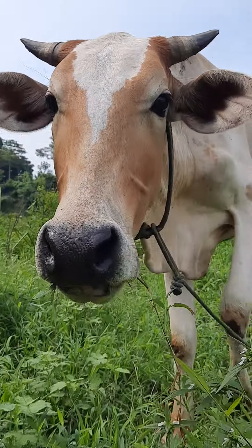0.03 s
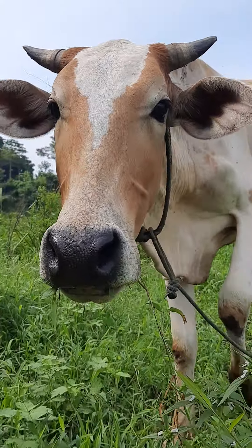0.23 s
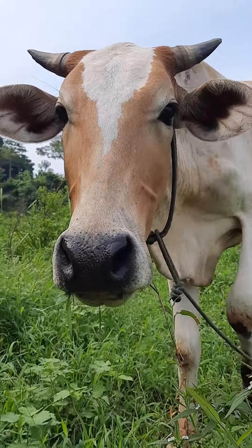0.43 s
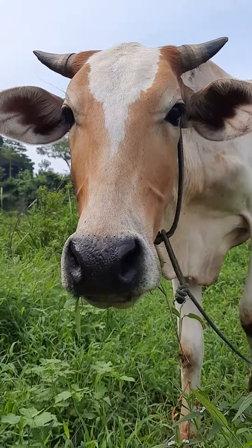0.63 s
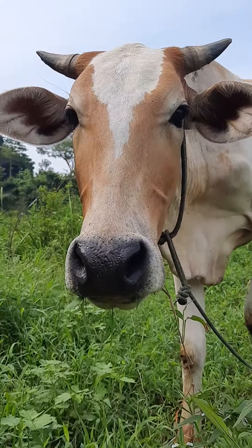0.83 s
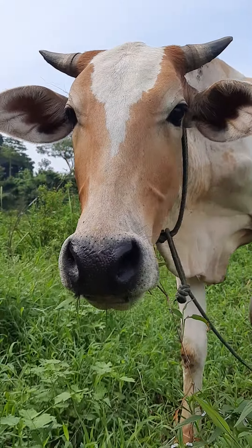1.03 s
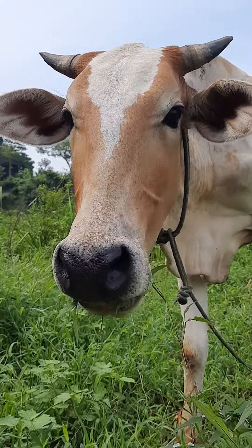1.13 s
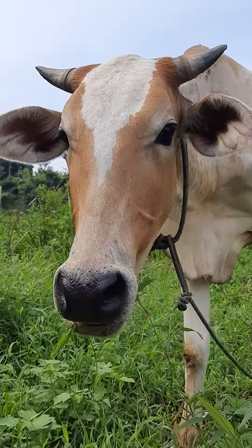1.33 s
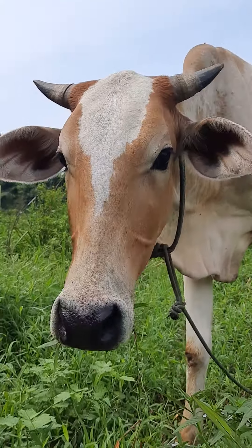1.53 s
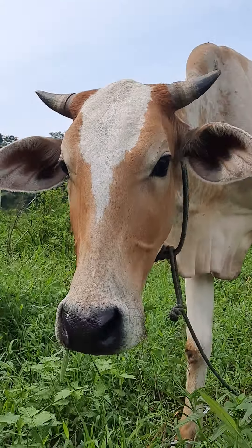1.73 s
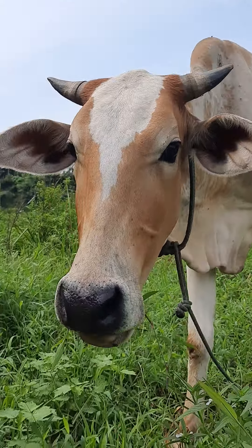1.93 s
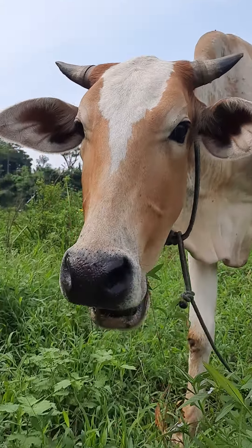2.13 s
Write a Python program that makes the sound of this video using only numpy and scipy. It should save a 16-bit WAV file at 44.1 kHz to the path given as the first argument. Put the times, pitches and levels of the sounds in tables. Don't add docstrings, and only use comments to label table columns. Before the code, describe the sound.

A cow tears and chews grass very close, amid heavy microphone knocks and shrill insects.

```python
import sys
import numpy as np
from scipy import signal
from scipy.fft import rfft, irfft, next_fast_len
from scipy.io import wavfile
from scipy.ndimage import uniform_filter1d, minimum_filter1d, map_coordinates

SR = 44100
rng = np.random.default_rng(int(sys.argv[2]) if len(sys.argv) > 2 else 0)


def to_wav(sig):
    pcm = np.clip(np.atleast_2d(sig), -1, 1) * 32767
    pcm = np.round(pcm).astype(np.int16)
    wavfile.write(sys.argv[1], SR, pcm.T)


def gain_from_decibels(decibels):
    exponent = np.asarray(decibels, float) / 20
    return 10 ** exponent


N = 95652
TIME = np.arange(N) / SR


def unit(x):
    return x / np.sqrt(np.mean(x ** 2) + 1e-20)


def curves(rows):
    s, *columns = np.transpose(rows)
    return [np.interp(TIME, s, column) for column in columns]


def wobble(rate):
    return map_coordinates(rng.standard_normal(N), [np.arange(N) * rate / SR])


def filtered(x, response):
    m = next_fast_len(N + SR // 2)
    spectrum = rfft(x, m) * response(np.fft.rfftfreq(m, 1 / SR))
    return irfft(spectrum, m)[:N]


def noise(points):
    f, db = np.transpose(points)

    def gain(hz):
        return gain_from_decibels(np.interp(np.log(hz + 1), np.log(f), db, left=-120))
    return unit(filtered(rng.standard_normal(N), gain))


def tube(peaks):
    def gain(f):
        total = 0
        for centre, width, db in peaks:
            resonator = 1j * f * width / (centre * centre - f * f + 1j * f * width)
            total = total + gain_from_decibels(db) * resonator ** 2
        return total
    return unit(filtered(rng.standard_normal(N), gain))


def bell(hz, wide_hz):
    return lambda f: np.exp(-.5 * ((f - hz) / wide_hz) ** 2)


def band_noise(hz, wide_hz):
    return unit(filtered(rng.standard_normal(N), bell(hz, wide_hz)))


def tone(hz, db):
    phase = 2 * np.pi * np.cumsum(hz) / SR
    return np.sqrt(2) * gain_from_decibels(db) * np.sin(phase)


def puffs(rows, hz, wide_hz):
    swell = sum(gain_from_decibels(db) * np.exp(-((TIME - s) / spread) ** 2) for s, db, spread in rows)
    return swell * band_noise(hz, wide_hz)


# f/Hz, level/dB
FIELD_TONE = [(20, -17), (80, -25), (200, -16.5), (450, -11.5), (900, -13.5), (3300, -17.5), (7000, -8),
              (12500, -10), (13500, -24), (15800, -14)]


def field():
    return gain_from_decibels(-61.5 + 1.2 * wobble(26)) * noise(FIELD_TONE)


# t/s, level/dB
CHORUS_LEVEL = [(0, -53.5), (.77, -52), (1.09, -57.5), (1.24, -55.5), (1.62, -58), (1.94, -52.5),
                (2.17, -59)]


def chorus():
    clicks_per_s = 1200
    db, = curves(CHORUS_LEVEL)
    clicks = (rng.random(N) < clicks_per_s / SR) * rng.standard_normal(N)
    clicks = clicks + 0.28 * rng.standard_normal(N)
    clicks *= gain_from_decibels(0.9 * wobble(40.36) + 1.22 * wobble(120))
    near = unit(filtered(clicks, bell(8630, 442)))
    far = band_noise(4784, 300)
    far_db = -64 + 0.13 * (db + 52) - 2 * TIME + wobble(9.9)
    return gain_from_decibels(db + 7.5) * near + gain_from_decibels(far_db) * far


def span(rows):
    fade_in = np.clip((TIME - rows[0][0]) / 0.01, 0, 1)
    fade_out = np.clip((rows[-1][0] - TIME) / 0.01, 0, 1)
    return fade_in * fade_out


# t/s, f/Hz, level/dB
WHISTLE_PATH = [(.675, 5320, -71), (.81, 5270, -63), (.85, 5060, -67), (.9, 4950, -71), (.94, 4990, -70),
                (.972, 4930, -69), (1.012, 5010, -69), (1.05, 4895, -68), (1.09, 4920, -67),
                (1.13, 5020, -66), (1.175, 4890, -66), (1.25, 4915, -66), (1.3, 5085, -68),
                (1.355, 4945, -67), (1.412, 4900, -65), (1.435, 4960, -73), (1.53, 5030, -71),
                (1.58, 4905, -72), (1.62, 4890, -84)]


def whistle():
    plunge_hz, plunge_s = 1710, 0.028
    buzz_hz, buzz_depth, buzz_from_s = 420, 1.05, .84
    hz, db = curves(WHISTLE_PATH)
    hz = hz + plunge_hz * np.exp(-np.abs(TIME - WHISTLE_PATH[0][0]) / plunge_s)
    buzz_onset = np.clip((TIME - buzz_from_s) / .05, 0, 1)
    buzz = buzz_depth * buzz_onset * tone(buzz_hz + 12 * wobble(15), -1.5 + 1.5 * wobble(30))
    voice = tone(hz + 3 * wobble(22) + 34 * wobble(260), db + 6 + 2.2 * wobble(110))
    throat, dip = bell(4905, 45), bell(4700, 70)
    return filtered(span(WHISTLE_PATH) * (1 + buzz) * voice, lambda f: 1 + 1.6 * throat(f) - 0.84 * dip(f))


# t/s, f/Hz, level/dB
RISE_PATH = [(.58, 6400, -78), (.61, 6350, -67), (.635, 6200, -72), (.67, 6600, -69), (.69, 7050, -65),
             (.72, 7350, -68), (.76, 7700, -76)]


def rising_whistle():
    hz, db = curves(RISE_PATH)
    return span(RISE_PATH) * tone(hz + 30 * wobble(120), db + 3 + 2 * wobble(60))


# t/s, length/s, start f/Hz, level/dB
CHIRP_CALLS = [
    (1.707, .03, 5500, -63),
    (1.796, .024, 5150, -63),
    (1.826, .056, 5550, -62),
    (1.94, .022, 4950, -66),
]


def chirps():
    end_hz, blur_hz, flutter_db = 4750, 90, 4
    out = np.zeros(N)
    for s, length, hz, db in CHIRP_CALLS:
        u = np.clip((TIME - s) / length, 0, 1)
        flutter = gain_from_decibels(flutter_db * np.sin(TIME * 700 + 9 * u))
        pitch = hz + (end_hz - hz) * u + blur_hz * wobble(180)
        out += np.sin(np.pi * u) * flutter * tone(pitch, db)
    return out


# t/s, level/dB
RUMBLE_LEVEL = [(0, -47.5), (.3, -40), (.55, -45.5), (.9, -46.5), (1.39, -44.5), (1.51, -47), (1.76, -49),
                (1.85, -36), (2.0, -51), (2.17, -49.5)]
# f/Hz, level/dB
RUMBLE_COLOUR = [(20, -38), (45, 3.5), (90, 0), (140, -5.5), (250, -18.5), (500, -32.5), (900, -63),
                 (2000, -100)]


def rumble():
    db, = curves(RUMBLE_LEVEL)
    return gain_from_decibels(db + 6.5 + 2.13 * wobble(30.04)) * noise(RUMBLE_COLOUR)


# t/s, level/dB, spread/s
HAND_SCUFFS = [
    (.075, -53.5, .04),
    (.26, -53.5, .035),
    (.79, -56, .025),
    (1.07, -63, 0.023),
    (1.21, -56, .02),
    (1.415, -60, .012),
    (1.86, -62, 0.038),
]


def scuffs():
    return puffs(HAND_SCUFFS, 480, 220) * gain_from_decibels(3 * wobble(120))


# t/s, level/dB, start f/Hz, life/s, pitch sag/(1/s)
HOUSING_SWINGS = [(0.039, -7.5, 81, .011, 7.7), (0.073, -27.5, 68, 0.027, 4.4),
                  (.208, -7.5, 84.6, 0.011, 4.6), (0.243, -22, 99, 0.023, 2),
                  (0.2898, -30.5, 103.4, 0.042, 3.2), (0.388, -29.5, 81, 0.028, 5.4),
                  (0.72, -27.5, 88.5, 0.016, 3.1), (0.7732, -4.5, 105, 0.029, 36),
                  (0.8082, -11, 97.6, 0.014, 35), (1.0511, -19, 84, 0.019, 3.3),
                  (1.0873, -24.5, 110, 0.014, 2.6), (1.194, -26, 102.6, 0.017, 2),
                  (1.4044, -11, 87, 0.012, 6.6), (1.492, -27.5, 85, 0.011, 2),
                  (1.729, -26, 77.6, 0.011, 2.7), (1.84, -42.5, 101, 0.014, 3.2),
                  (1.9628, 12.5, 121, 0.0044, 180), (1.9733, -7.5, 113.4, 0.024, 1),
                  (2.122, -30, 75.7, 0.023, 3), (0.509, -31.5, 120.2, 0.055, 2.07),
                  (0.826, -19.5, 73.4, 0.015, 3), (2.016, -28, 92.5, 0.029, 1.5)]


def swings():
    rise_s, fade_power = 0.0016, 2.36
    out = np.zeros(N)
    for s, db, hz, life, sag in HOUSING_SWINGS:
        u = np.clip(TIME - s, 0, None)
        turns = hz * (1 - np.exp(-sag * u)) / sag
        envelope = np.exp(-(u / life) ** fade_power) * (1 - np.exp(-(u / rise_s) ** 2))
        out += gain_from_decibels(db) * np.sin(2 * np.pi * turns) * envelope
    return out


# t/s, level/dB, f/Hz
KNOCK_EDGES = [
    (0.0399, -50, 1200),
    (0.208, -56, 885),
    (0.772, -46.5, 1290),
    (1.193, -54, 1110),
    (1.404, -51.5, 1500),
    (1.814, -63, 1200),
    (1.8655, -64, 1300),
    (1.9627, -37, 1760),
]


def snaps():
    width_ms = 1
    grit = noise([(700, 8), (1700, -12.5), (3000, -14.5), (16000, -39.5)])
    out = np.zeros(N)
    for s, db, hz in KNOCK_EDGES:
        envelope = np.exp(-.5 * ((TIME - s) * 1000 / width_ms) ** 2)
        out += gain_from_decibels(db) * envelope * (np.cos(2 * np.pi * hz * (TIME - s)) + 0.65 * grit)
    return out


# t/s, peak level/dB,
# width/ms, direction (sign), lobe before it (0-1)
HOUSING_KNOCKS = [(0.0405, -2, 0.75, -1, 0.27), (0.063, -14.5, 0.64, 1, 0), (0.2086, -7, 0.73, -1, .3),
                  (0.237, -15.5, 0.98, 1, 0.6), (0.261, -21.5, 0.74, -1, 0.1), (0.7723, -8, 0.57, -1, 0),
                  (0.7737, -13.5, 0.62, 1, 0.17), (0.804, -15.5, 1.6, 1, 0.1), (0.807, -26, 0.68, -1, 0),
                  (1.05, -16, 0.76, -1, 0.47), (1.0467, -17, 0.93, 1, 0), (1.17, -24, 0.81, -1, 0.4),
                  (1.19, -30, 0.48, 1, 0.5), (1.1931, -15.5, 0.6, -1, 0), (1.205, -26, 0.53, 1, 0.3),
                  (1.212, -28, 0.5, -1, 0.7), (1.405, -6, 0.53, -1, 0.38), (1.808, -21, 0.77, 1, 0.27),
                  (1.8145, -26.5, 0.76, -1, 0.24), (1.841, -35, 0.52, -1, .3), (1.851, -36.5, .5, 1, .3),
                  (1.8653, -38, 0.49, 1, 0.2), (1.879, -40.5, 0.4, -1, .3), (1.895, -24.5, 0.86, 1, 0.35),
                  (1.957, -25, 0.88, -1, 0), (1.96, -13.5, 0.57, -1, 0.26), (1.9629, 6, 0.58, 1, 0.12),
                  (1.9641, 16, 0.69, -1, 0.06), (2.1686, -36, 0.075, 1, 0), (1.9705, -5.5, .8, -1, 0.3),
                  (1.9731, 7, 0.87, -1, 0), (2.034, -31, 0.73, 1, 0.5)]


def knocks():
    lead = 1.72

    def bump(u):
        return 1 / np.cosh(np.clip(0.77 * u, -40, 40)) ** 2
    out = np.zeros(N)
    for s, db, ms, way, lobe in HOUSING_KNOCKS:
        u = (TIME - s) * 1000 / ms
        push = bump(u) - lobe * bump(0.76 * (u + lead))
        out += gain_from_decibels(db) * np.sign(way) * push
    return out


# t/s, level/dB, upper resonances level/dB
NOSE_BREATH = [(0, -78, 7), (.06, -59.5, 1.5), (.17, -70.5, -3), (.3, -55.5, -9), (.4, -64.5, -4.5),
               (.58, -72, 3), (.65, -79.5, 2), (.88, -78.5, -19), (.95, -63.5, -18), (1.12, -52.5, -16),
               (1.22, -53.5, -14), (1.3, -64, -5), (1.43, -64, -4.5), (1.48, -72.5, 6.5),
               (1.62, -54.5, -0.5), (1.69, -60, -3), (1.72, -80, 2), (2.17, -88, -21)]
# f/Hz, width/Hz, level/dB
NOSE_LOWER = [(290, 62, -2.5), (469, 203, 5)]
# f/Hz, width/Hz, level/dB
NOSE_UPPER = [(979, 120, 1), (1089, 136, 3.5), (1293, 420, 3)]


def nose():
    db, upper_db = curves(NOSE_BREATH)
    upper = gain_from_decibels(upper_db + 0.97 * wobble(60)) * tube(NOSE_UPPER)
    return gain_from_decibels(db + 0.74 * wobble(35.34)) * (tube(NOSE_LOWER) + upper)


# t/s, level/dB, spread/s
STALK_CRACKS = [
    (1.215, -66, .012),
    (1.425, -67, .012),
    (1.752, -60, .005),
]


def stalks():
    return puffs(STALK_CRACKS, 11800, 1500)


# t/s, level/dB, spread/s
MUNCH_STROKES = [
    (.06, -61, 0.089),
    (.42, -59.5, 0.17),
    (1.121, -64, 0.13),
    (1.61, -65, 0.056),
    (2.12, -68.5, 0.069),
]


def munch():
    return puffs(MUNCH_STROKES, 2030, 1100)


# t/s, level/dB, rise/s, fall/s
GRASS_TEARS = [
    (0.059, -57, 0.071, 0.071),
    (0.289, -65, 0.12, 0.078),
    (0.541, -61, 0.032, 0.033),
    (2.099, -72, 0.043, 0.11),
]
# f/Hz, level/dB
GRASS_TONE = [(1500, -2), (3000, -2.5), (6000, -2), (10000, 5), (13000, 1), (15800, 0)]
# f/Hz, level/dB
COVERED_TONE = [(600, 0.5), (1000, 1), (2000, -2.5), (4000, -14.5), (9000, -38.5), (13400, 0.5),
                (15000, -26), (16000, -30)]


def grass():
    swell = np.zeros(N)
    for s, db, rise, fall in GRASS_TEARS:
        side = np.where(TIME < s, rise, fall)
        swell += gain_from_decibels(db) * np.exp(-np.abs((TIME - s) / side) ** 0.78)
    open_port = swell * gain_from_decibels(13.0 + 1.5 * wobble(50)) * noise(GRASS_TONE)
    covered_port = (gain_from_decibels(-79.5) + gain_from_decibels(-20) * swell) * noise(COVERED_TONE)
    return open_port, covered_port


def scene():
    tearing, leak = grass()
    breath = nose()
    left = field() + chorus() + whistle() + rising_whistle() + chirps()
    left += breath + stalks() + munch() + tearing
    right = rumble() + scuffs() + swings() + snaps() + knocks()
    right += leak + gain_from_decibels(-14.0) * filtered(breath, bell(870, 600))
    return np.array([left, right])


def band_limit(x):
    return signal.sosfilt(signal.butter(12, 16460, fs=SR, output="sos"), x)


def record(dry):
    low_cut_hz, band_hz = 31.2, 15800
    ceiling, hold_s, release_db_s = .995, 0.017, 275

    def band(f):
        return (f < band_hz) * f ** 4 / (f ** 4 + low_cut_hz ** 4)
    dry = np.array([filtered(x, band) for x in dry])
    over_db = np.clip(20 * np.log10(np.abs(dry).max(0) / ceiling + 1e-9), 0, None)
    hold, ahead = int(hold_s * SR), 60
    held = -minimum_filter1d(-over_db, size=hold + 2 * ahead, origin=(hold - 1) // 2)
    release = release_db_s * TIME
    cut_db = np.maximum.accumulate(held + release) - release
    mix = dry * gain_from_decibels(-uniform_filter1d(cut_db, size=ahead))
    return band_limit(mix)


dry = scene()
out = record(dry)
to_wav(out)
```